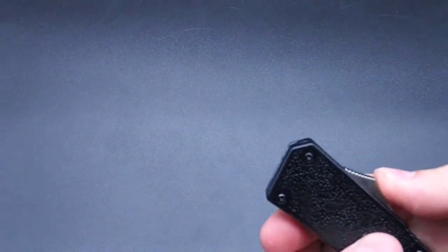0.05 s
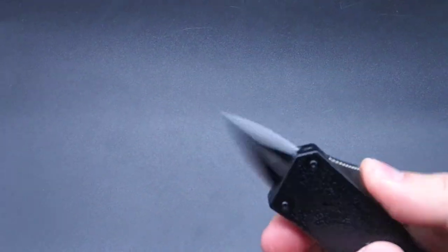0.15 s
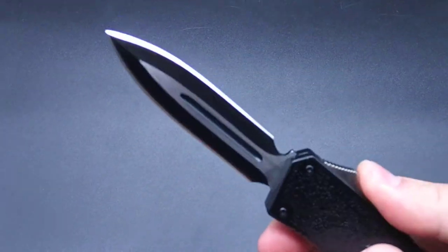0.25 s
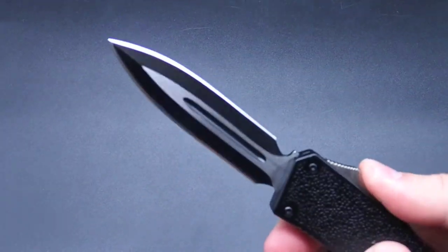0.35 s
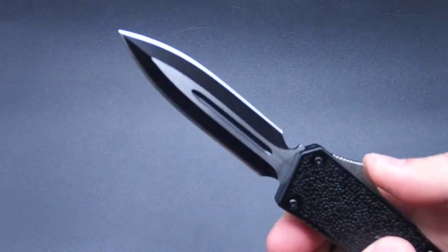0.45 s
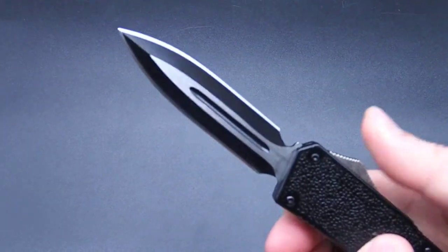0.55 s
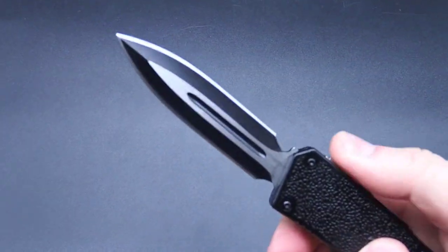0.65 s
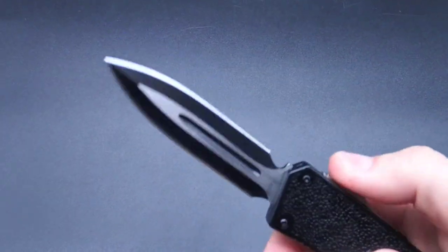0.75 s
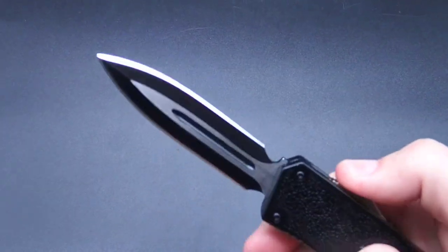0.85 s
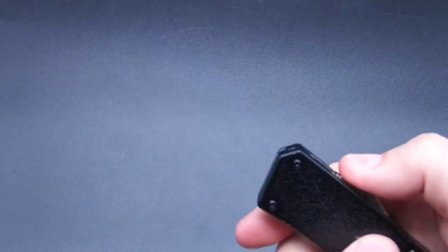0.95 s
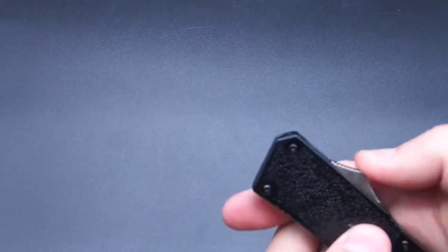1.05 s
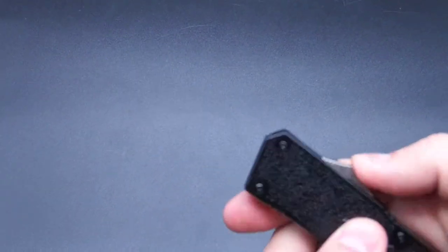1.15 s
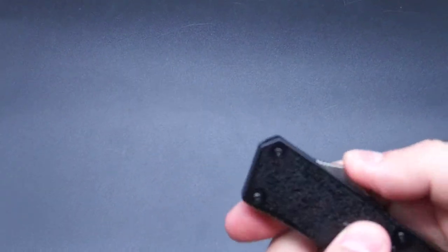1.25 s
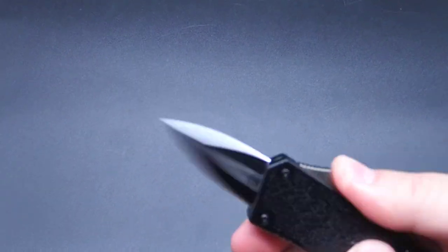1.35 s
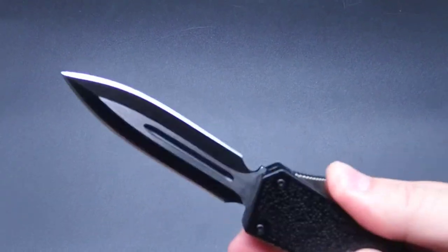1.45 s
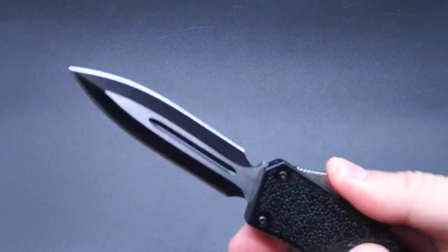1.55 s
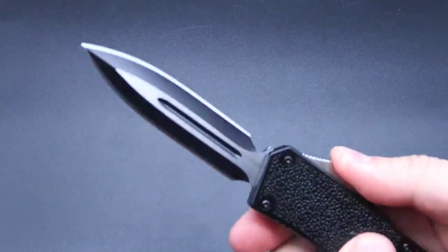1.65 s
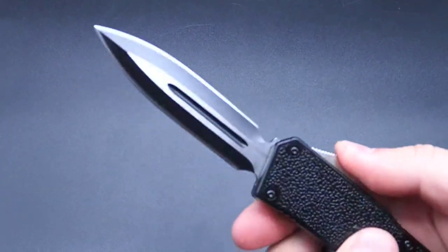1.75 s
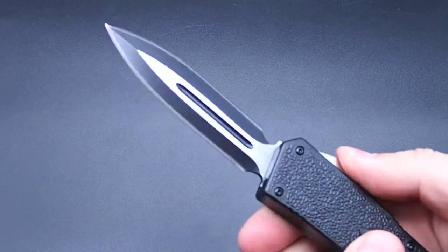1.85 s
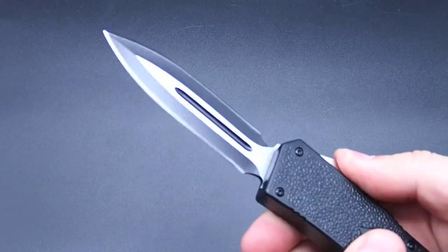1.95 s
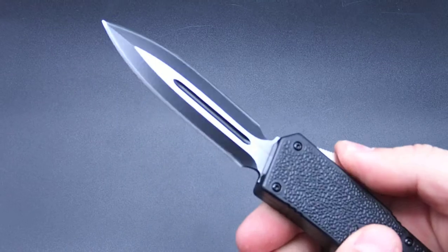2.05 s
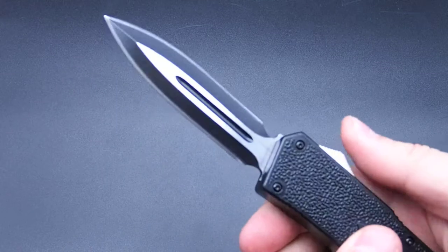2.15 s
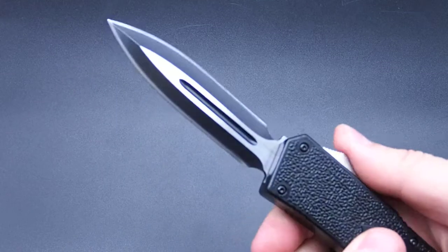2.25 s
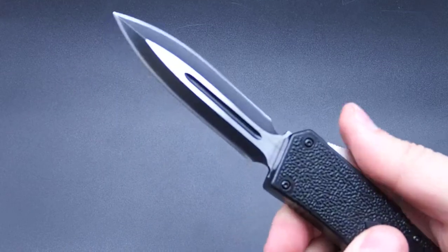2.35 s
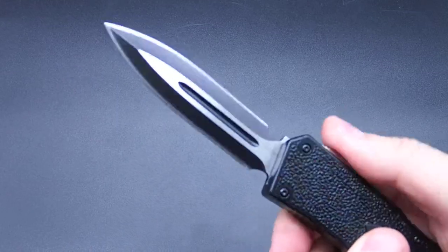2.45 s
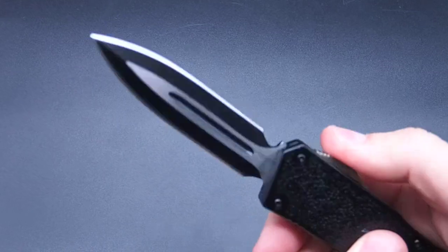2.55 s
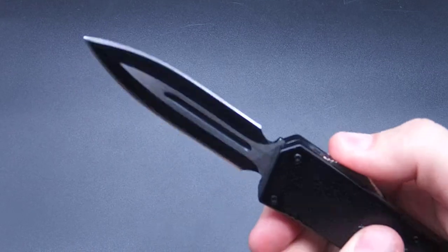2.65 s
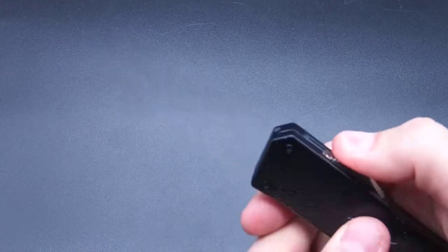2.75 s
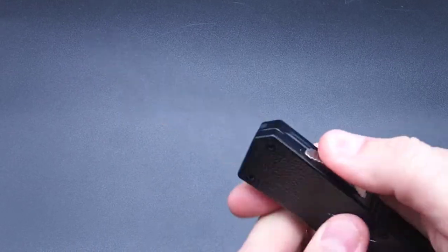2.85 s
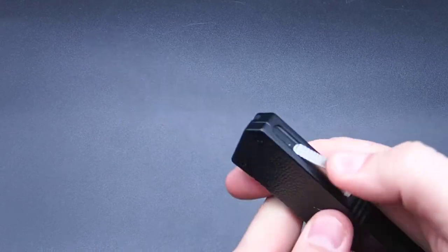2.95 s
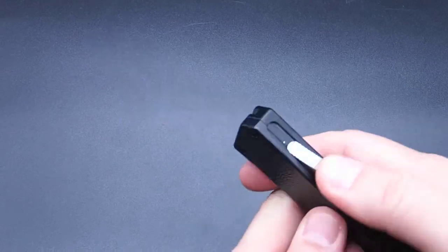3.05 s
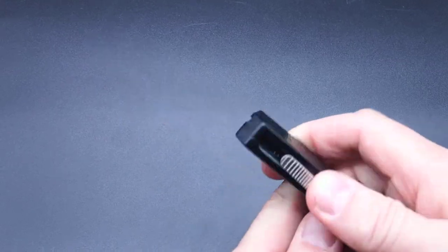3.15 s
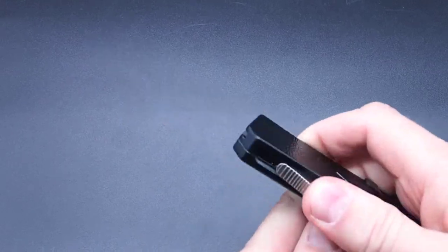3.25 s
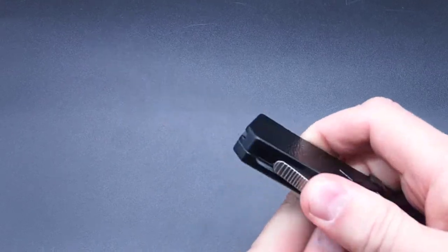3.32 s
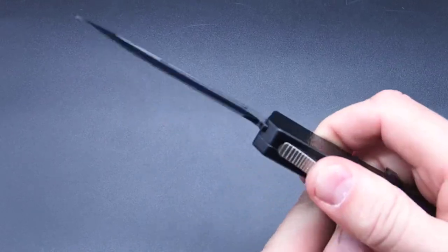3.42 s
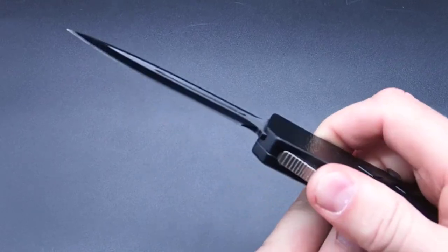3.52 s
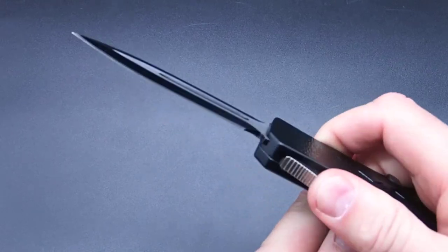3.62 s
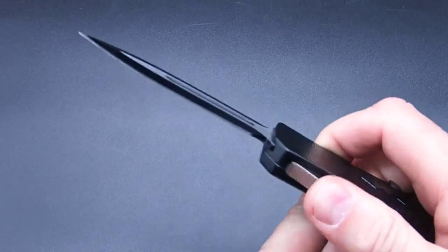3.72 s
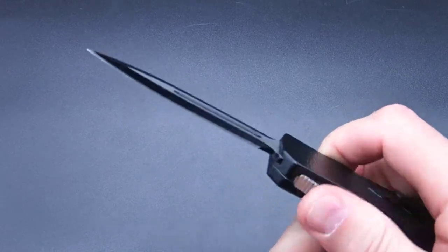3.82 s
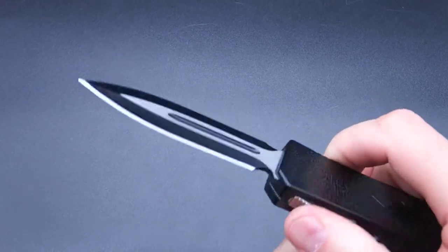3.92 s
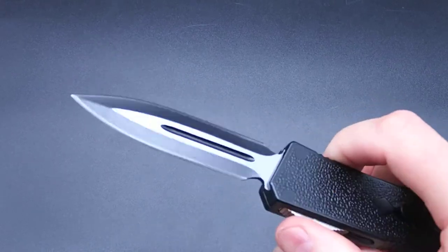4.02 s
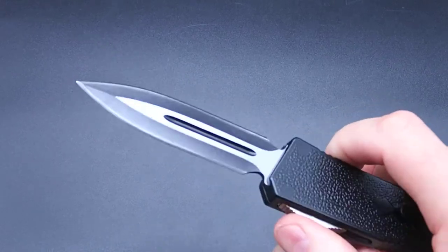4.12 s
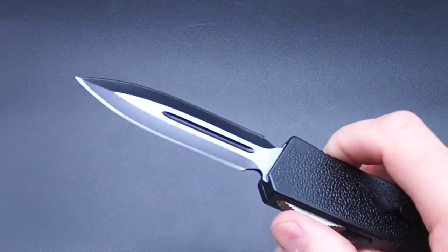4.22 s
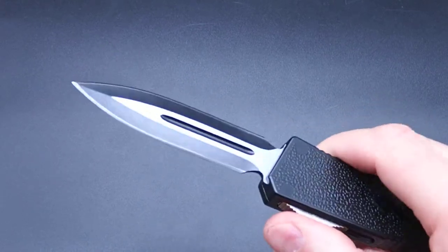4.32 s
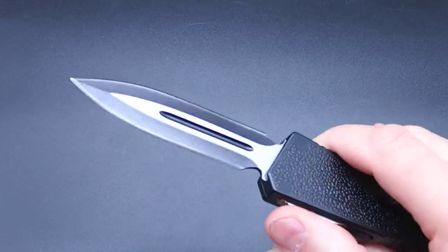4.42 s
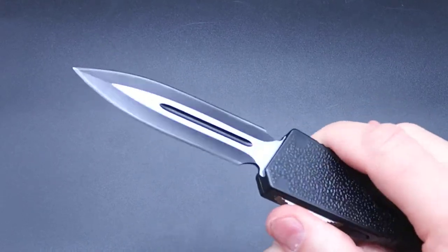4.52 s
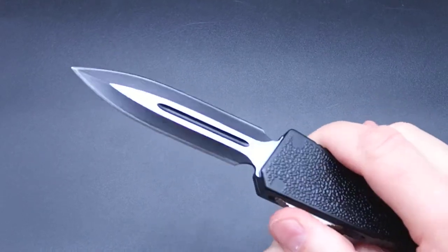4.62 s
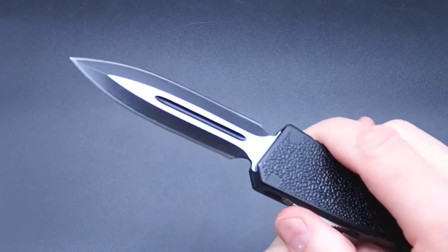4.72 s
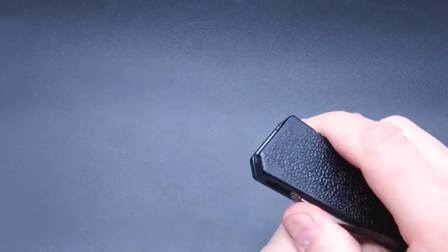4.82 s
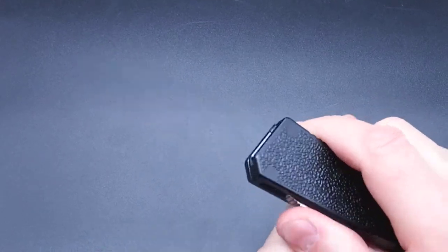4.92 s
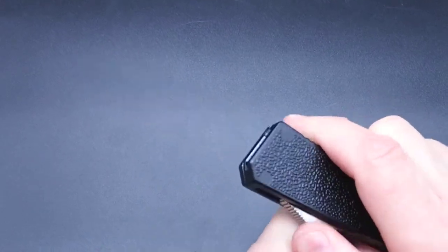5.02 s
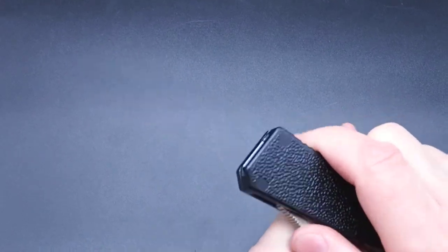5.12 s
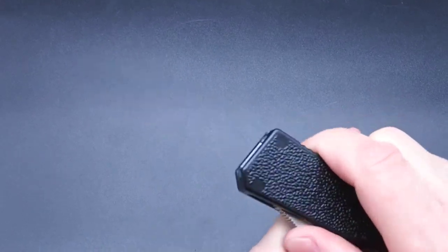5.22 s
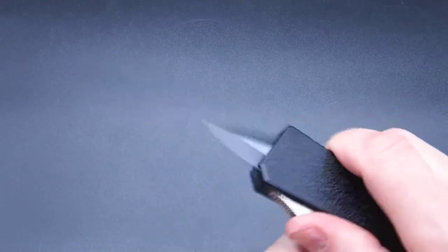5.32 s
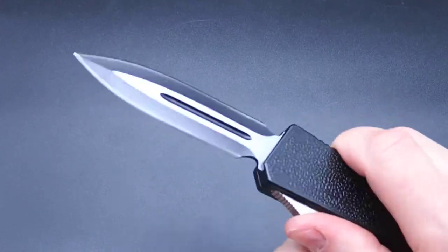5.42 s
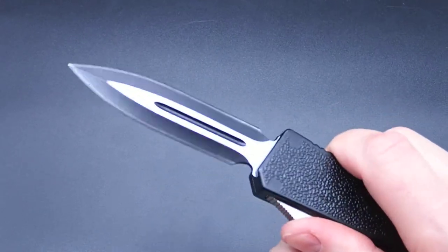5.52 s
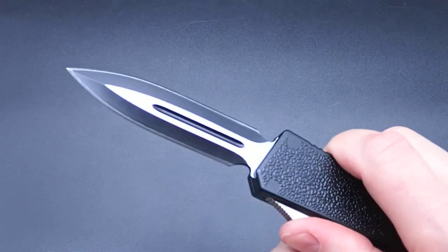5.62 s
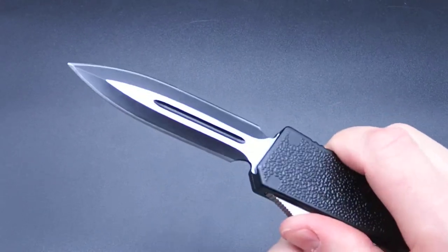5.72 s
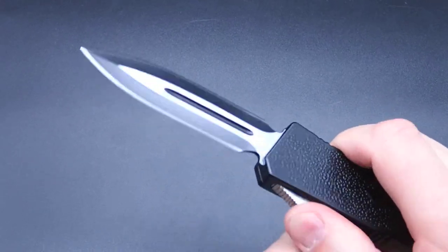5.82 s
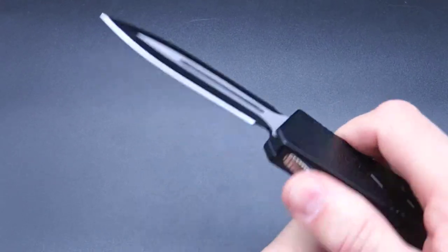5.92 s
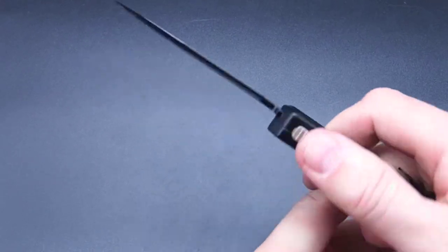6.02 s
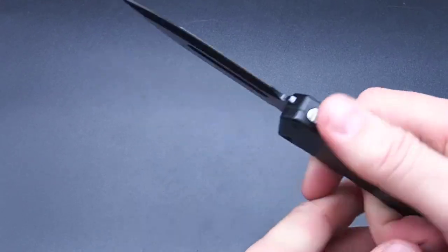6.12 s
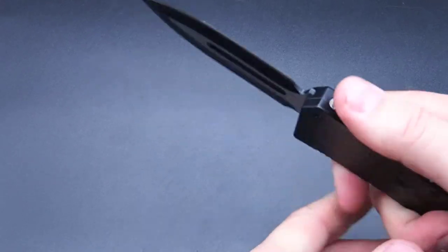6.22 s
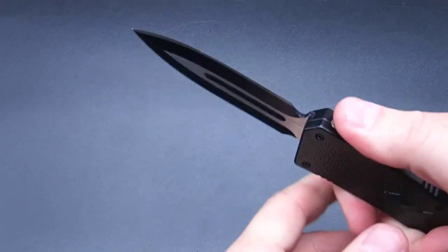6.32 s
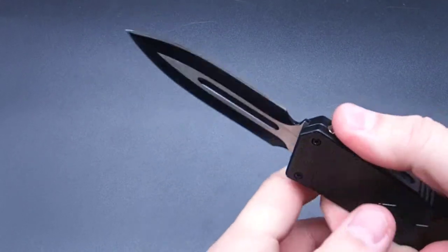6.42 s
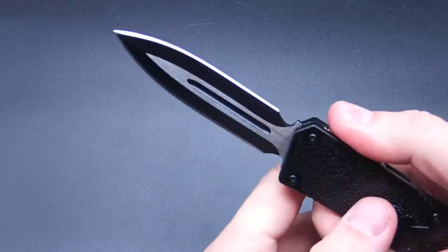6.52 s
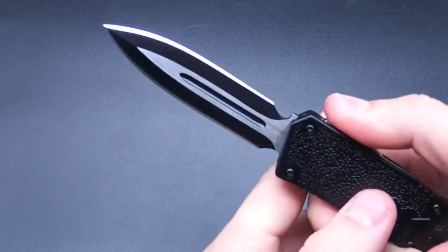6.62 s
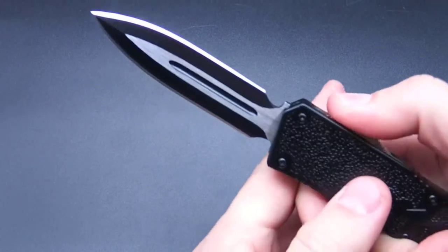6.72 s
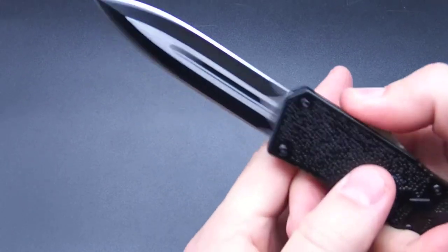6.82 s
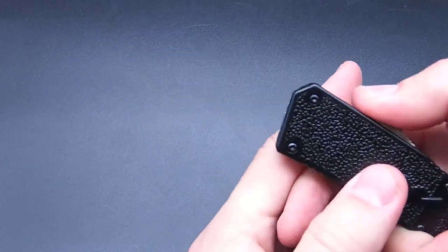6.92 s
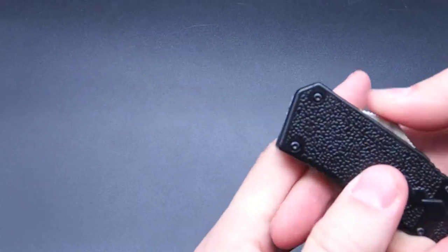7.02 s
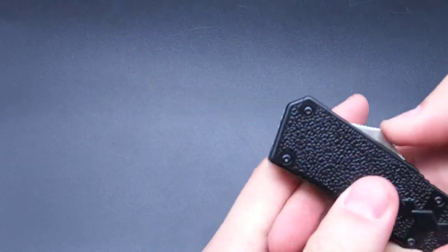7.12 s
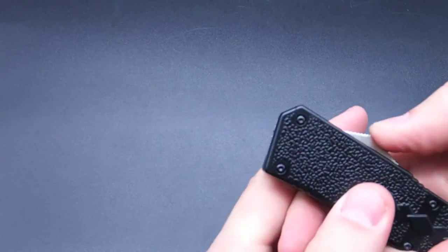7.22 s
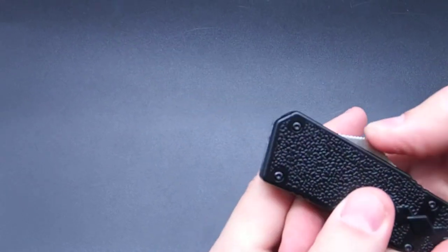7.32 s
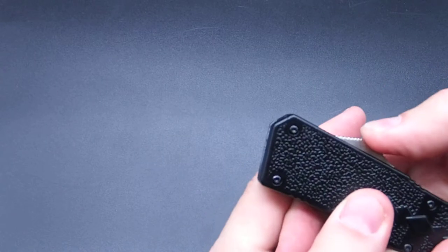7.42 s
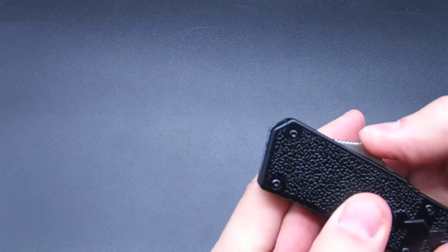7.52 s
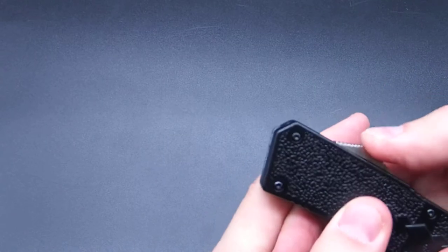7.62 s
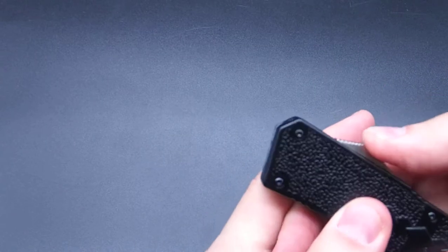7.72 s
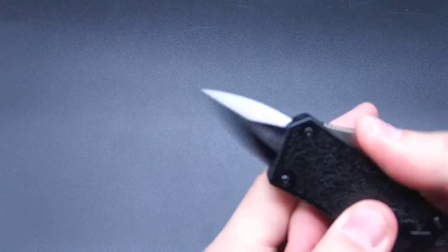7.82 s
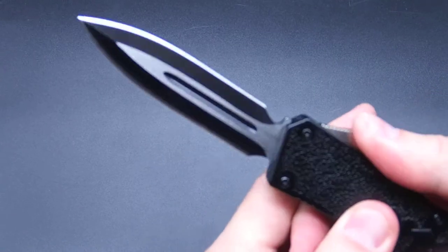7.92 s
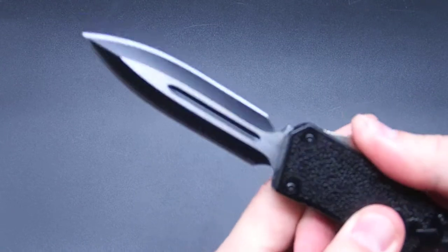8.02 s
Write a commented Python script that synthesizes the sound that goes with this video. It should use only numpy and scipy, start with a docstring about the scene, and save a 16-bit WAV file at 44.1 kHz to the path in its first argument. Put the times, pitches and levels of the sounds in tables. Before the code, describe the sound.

A spring-driven metal blade snaps out and back nine times with sharp rattling double clicks, over quiet hiss and faint slider scrapes, close up.

```python
"""Hiss comes first, then the small ticks of a thumb on the slider of a spring-driven blade in a metal handle.
Quiet room, small stereo microphone close by. The slider scrapes and squeaks as random slips until the latch
lets go in a burst of noisy chatter; 32-49 ms later the blade slams into its stop, a click that rings the handle.
Nine shots alternate out and in. The recorder turns its gain down on every snap, so the hiss sinks and
swells back; the hardest blows clip."""
import sys
import numpy as np
from scipy import signal
from scipy.fft import rfft, irfft, next_fast_len
from scipy.io import wavfile
from scipy.ndimage import uniform_filter1d

SR = 44100
rng = np.random.default_rng(int(sys.argv[2]) if len(sys.argv) > 2 else 0)


def generate_wav(sig):
    """Save sig (samples, or channels by samples) to the path in sys.argv[1] as 16-bit PCM at SR."""
    pcm = np.round(np.clip(np.atleast_2d(sig).T, -1, 1) * 32767).astype(np.int16)
    wavfile.write(sys.argv[1], SR, pcm)


N = 355446


def amp(db):
    """Decibels to gain."""
    return 10 ** (np.asarray(db) / 20)


def at_hz(points, hz, column=1):
    """A table read on a log-frequency axis."""
    p = np.array(points)
    return np.interp(np.log(np.maximum(hz, 1)), np.log(p[:, 0]), p[:, column])


def causal(points, size=2048):
    """Minimum-phase response of a spectrum: nothing sounds before the blow; peak 1."""
    hz = np.arange(size // 2 + 1) * SR / size
    cepstrum = irfft(np.log(amp(at_hz(points, hz))))
    # fold the cepstrum onto positive time
    cepstrum[1:size // 2] *= 2
    cepstrum[size // 2 + 1:] = 0
    h = irfft(np.exp(rfft(cepstrum)))
    return h / np.abs(h).max()


def band(x, kind, hz):
    """A slice of the spectrum cut by a Butterworth filter of design order 4."""
    return signal.sosfilt(signal.butter(4, hz, kind, fs=SR, output="sos"), x)


def sides(db):
    """Left and right gains for a left-right difference."""
    return amp(np.multiply.outer([.5, -.5], db))


def contacts(s, db):
    """A train of one-sample clicks."""
    # the tiny offset keeps the filters off denormal numbers
    return np.bincount(np.round(np.asarray(s) * SR).astype(int), amp(db), N) + 1e-12


# Colour of room air and microphone noise: [f/Hz, relative level/dB per Hz]
HISS_COLOUR = [(15, -54), (25, -17.5), (87, -5.5), (260, -1.5), (1560, -7.5), (1880, -17.5), (2150, -12.5),
               (2600, -21.5), (3140, -16), (3900, -26), (4900, -10.5), (7000, -9), (8100, -6.5),
               (9200, -13), (15900, -16)]
# How alike the two ports hear it: [f/Hz, left-right likeness -1 to 1]
HISS_LIKENESS = [(60, 0.36), (240, 0.052), (950, 0.14), (3770, -0.16), (15000, -0.12)]
# How it leans between the ports: [f/Hz, left-right level/dB]
HISS_BALANCE = [(60, 0.5), (380, 5), (2380, 3), (15000, 1.5)]
HISS_DB = -54   # ahead of the recorder's gain control


def hiss():
    """Room air and microphone noise: shaped noise, most alike in both ports in the deep bass."""
    size = next_fast_len(N)
    hz = np.arange(size // 2 + 1) * SR / size
    mid, side = rfft(rng.standard_normal((2, size)))
    alike = at_hz(HISS_LIKENESS, hz)
    both = np.sqrt(1 + alike) * mid + np.sqrt(1 - alike) * side * [[1], [-1]]
    shape = amp(at_hz(HISS_COLOUR, hz)) * sides(at_hz(HISS_BALANCE, hz))
    out = irfft(both * shape, size)[:, :N]
    return amp(HISS_DB) * out / out.mean(0).std()


# Room answer by band: [f/Hz, near reflections' t60/s, near level/dB, late tail level/dB]
ROOM_BANDS = [(700, .08, -17, -48.5), (1990, 0.08, -8.5, -32), (4000, 0.11, -8, -25),
              (6050, 0.084, -4.5, -24), (9000, 0.11, -11.5, -28), (14000, 0.076, -16.5, -32)]
LATE_T60_S = 0.29


def room(x):
    """Dense near reflections and a fainter, longer tail, other ones at each port, dying band by band."""
    size = SR // 2
    t, hz = np.arange(size) / SR, np.arange(size // 2 + 1) * SR / size
    noise = rfft(rng.standard_normal((2, size)))
    centres = np.array(ROOM_BANDS)[:, 0]

    def dying(db, t60):
        return amp(db - 60 * t / t60) / np.sqrt(t60 * SR / np.log(1e6))

    tail = 0
    for k, (_, t60, near_db, late_db) in enumerate(ROOM_BANDS):
        only_this_band = np.arange(len(centres)) == k
        share = at_hz(np.c_[centres, only_this_band], hz)   # cross-fades into the neighbours
        tail = tail + (dying(near_db, t60) + dying(late_db, LATE_T60_S)) * irfft(noise * share)
    tail *= np.clip((t - .002) / .004, 0, 1)   # the nearest surface answers after a few ms
    return signal.oaconvolve(x, tail, axes=1)[:, :N]


# Each shot of the blade: [way, latch lets go t/s, blade slams t/s, release rattle level/dB, its t60/s,
# lock rattle level/dB, slam level/dB, rebound rattle level/dB]
SHOTS = [("out", 0.171, 0.2181, -9.5, .068, -14, 9.5, -4),
         ("in", 0.8957, 0.9292, -11.5, .28, -11, 9.5, -2.5),
         ("out", 1.3665, 1.4153, -11, .088, -7.5, 13, -5.5), ("in", 2.7353, 2.7682, -9.5, .12, -14, 11, -3),
         ("out", 3.39, 3.4387, -11, .1, -7.5, 11, -3), ("in", 4.7905, 4.8235, -9.5, .22, -10.5, 18.5, -1.5),
         ("out", 5.345, 5.3908, -12, .15, -9, 14, -1.5), ("in", 6.8508, 6.8825, -10.5, .25, -10.5, 10, -3),
         ("out", 7.8436, 7.8914, -9.5, .08, -6, 13, -4.5)]
# Slider dragged against the spring until each latch lets go: [start t/s, hardest push t/s,
# level/dB at start, at hardest, at end, squeak f/Hz, squeak level/dB re scrape when hardest]
DRAGS = [(0.085, 0.105, -60, -51, -56, 5590, -5), (0.75, 0.826, -59, -47.5, -57, 5430, -6),
         (1.29, 1.356, -59, -47, -47, 5700, -1.5), (2.572, 2.68, -51, -51, -63, 5450, -14),
         (3.31, 3.38, -61.5, -48, -56, 5700, 9), (4.61, 4.695, -58, -53, -52, 5570, 6),
         (5.247, 5.298, -53, -45, -62, 5660, 6), (6.668, 6.735, -52, -48, -61, 5520, 5),
         (7.74, 7.83, -52, -52, -54, 5580, -2.1)]
# Colour of sliding metal: [f/Hz, relative level/dB per Hz]
SCRAPE = [(2500, -19), (4200, -22.5), (4800, -2), (5500, 1), (6300, -4), (7300, -3.5), (8300, -10.5),
          (9500, -20), (15000, -19)]
# Latch grating at the moment it lets go, by way: level/dB
CREEP_DB = {"out": -39, "in": -49}
CREEP_RISE_S = .035   # time the grating takes to climb 60 dB
SQUEAK_FADE_DB_PER_S = 150   # either side of the hardest push


def drag(slips_per_s, spread_db, squeak_width_hz, lean_db, lump_db, lump_hz):
    """Uneven slips of the slider along its groove, with a rough squeak strongest at the hardest push."""
    t = np.arange(N) / SR
    level, pitch, squeak = np.zeros((3, N))
    for (start, hardest, *level_db, hz, squeak_db), (way, release_s, *_) in zip(DRAGS, SHOTS):
        on = (t >= start) & (t < release_s)
        push_db = np.interp(t, [start, hardest, release_s], level_db)
        # the latch grates louder in the last moments before it lets go
        creep_db = CREEP_DB[way] - 60 * abs(release_s - t) / CREEP_RISE_S
        level += on * (amp(push_db) + amp(creep_db))
        pitch += on * hz
        squeak += on * amp(squeak_db - SQUEAK_FADE_DB_PER_S * abs(t - hardest))
    happens = rng.random(N) < slips_per_s / SR
    slips = happens * amp(spread_db * rng.standard_normal(N)) * rng.choice([-1, 1], N)
    scrape = signal.oaconvolve(slips, causal(SCRAPE))[:N]
    lumps = band(rng.standard_normal(N), "low", lump_hz)
    lumpy_scrape = amp(lump_db * lumps / lumps.std()) * scrape / scrape.std()
    # slow part of the slips roughens the squeak
    waver = band(slips, "low", squeak_width_hz)
    tone = squeak * waver / waver.std() * np.sin(2 * np.pi * np.cumsum(pitch) / SR)
    return sides(lean_db)[:, None] * level * (lumpy_scrape + tone)


# How the two ports hear the knife's main band, lows, mids and highs:
# [filter kind, edges f/Hz, left-right level/dB, likeness 0-1, unused]
PORTS = [("band", [4260, 9110], 2.3, 0.88, 0), ("band", [436, 1910], 1.5, 0.98, 0), ("band", [1580, 4400],
         0.71, .97, 0), ("high", 9000, 5.7, 0.36, 0.72)]


def in_bands(rows, colour, click, grit_level):
    """Clicks and gritty noise coloured band by band; rows give the main level, then lows, mids, highs re it."""
    level_db, *others_db = np.transpose(rows)
    common, own = rng.standard_normal(N), rng.standard_normal((2, N))
    out = 0
    for extra_db, (kind, hz, lean_db, alike, _) in zip((0, *others_db), PORTS):
        h = band(causal(colour), kind, hz)
        noise = np.sqrt(alike) * common + np.sqrt(1 - alike) * own
        grit = noise * grit_level(level_db + extra_db) / np.sqrt(h @ h)
        sharp = click(level_db + extra_db) / np.abs(h).max()
        both = sides(lean_db)[:, None] * (grit + sharp)
        out = out + signal.oaconvolve(both, h[None], axes=1)[:, :N]
    return out


# Ringing modes of handle and blade: [f/Hz, relative level/dB, t60/s, left-right level/dB]
MODES = [(840, -60, 0.05, 0.1), (2050, -42.5, 0.09, -8), (3130, -34.5, 0.037, -11),
         (3900, -35.5, 0.026, 21), (4500, -23, 0.056, 4), (5300, -12, 0.032, 13), (5510, -42.5, 0.034, -21),
         (6400, -37, .03, -14), (6620, -35, .02, 2), (7560, -27.5, 0.0245, 4), (9900, -25, .03, -9),
         (14000, -50, .02, 8)]


def blows(rows, colour, sharp, chatter_db, chatter_t60, ring_db):
    """Each blow is a click trailed by a dying chatter, and it rings the handle's modes."""
    rows = np.array(rows)
    s, level_db = rows[:, 0], rows[:, 1]
    fade = amp(-60 / (chatter_t60 * SR))

    def click(db):
        return sharp * contacts(s, db)

    def chatter(db):
        return amp(chatter_db) * signal.lfilter([1], [1, -fade], contacts(s, db))

    out = in_bands(rows[:, 1:5], colour, click, chatter)
    luck = rng.uniform(-1, 1, (len(s), len(MODES)))
    for k, (hz, mode_db, t60, lean_db) in enumerate(MODES):
        # each blow lands elsewhere, so each mode's share varies
        clicks = contacts(s, level_db + ring_db + mode_db + 6.8 * luck[:, k])
        r, w = amp(-60 / (t60 * SR)), 2 * np.pi * hz / SR
        ring = signal.lfilter([0, np.sin(w)], [1, -2 * r * np.cos(w), r * r], clicks)
        out += sides(lean_db)[:, None] * ring
    return out


# Thumb and slider ticks: [t/s, level/dB, lows level/dB re that]
TICKS = [(0.0415, -41, -21), (0.0505, -36, -25), (0.5237, -39, -10.1), (0.7234, -44, -10.1),
         (0.7587, -43, -14), (0.8195, -36.5, -19.5), (1.056, -33, -10.1), (1.2431, -20.1, -38),
         (1.7913, -38, -17), (1.8094, -36, -13), (2.5735, -39, -17), (3.25, -39, -15), (3.277, -38, -18),
         (4.2832, -34.5, -20.1), (4.59, -31, -27), (4.5955, -33, -27), (4.6733, -44, -17),
         (4.7202, -37, -17), (5.252, -38, -25), (6.6702, -32.5, -20.1), (6.7037, -40, -23),
         (6.717, -38, -22), (6.7945, -37, -17), (7.3264, -48, -12), (7.4056, -28, -22), (7.4654, -41, -14),
         (7.5602, -36, -18), (7.631, -39, -18), (7.6365, -35, -18), (7.7433, -39.5, -21)]


def ticks(mids_db, highs_db):
    """Thumb and slider touch metal: faint clicks in the scrape's colour with a short grating trail."""
    rows = [(s, db, lows_db, mids_db, highs_db) for s, db, lows_db in TICKS]
    return blows(rows, SCRAPE, sharp=0.49, chatter_db=-10.5, chatter_t60=0.049, ring_db=-7)


# A hard contact as the microphone colours it: [f/Hz, relative level/dB per Hz]
CRACK = [(59, -61), (100, -32.5), (523, -32), (1570, -32.5), (1830, -33.5), (2680, -15.5), (3040, -15),
         (4090, -22), (5500, 1.5), (8060, -5), (9150, -14), (12100, -14.5), (14300, -9.5), (15900, -37)]
# Rattle after release, by way: [swell/dB, swell/s, then lows, mids, highs level/dB re main]
RELEASE = {"out": (6.5, .011, -30, -20.5, -8.5), "in": (12, .006, -31, -21, -7.5)}
# Rattle after the slam, by way: [swell/dB, swell/s, t60/s, then lows, mids, highs level/dB re main]
REBOUND = {"out": (0.1, .006, .07, -30, -21, -11.5), "in": (0.1, .005, .056, -36, -17, -11.5)}
# Lock riding up just before the slam, by way: [lead/s, swell/dB, swell/s, t60/s,
# then lows, mids, highs level/dB re main]
LOCK = {"out": (.0088, 6, .008, .033, -26, -19, -8), "in": (.0035, 11, .0035, .02, -27, -19, -11)}
STOP_T60_S = .03   # the travel rattle is choked once the blade has slammed home


def rattle(uneven_db, lump_s, rebound_s):
    """Loose parts clatter too densely to tell apart: lumpy noise swells at release, lock and rebound, then dies."""
    bursts = []   # start s, choked from s, level, swell dB, swell s, t60 s, lows, mids, highs
    for way, release_s, slam_s, release_db, t60, lock_db, _, rebound_db in SHOTS:
        swell_db, swell_s, *colour = RELEASE[way]
        lead_s, *lock = LOCK[way]
        bursts += [(release_s, slam_s, release_db, swell_db, swell_s, t60, *colour),
                   (slam_s + rebound_s, np.inf, rebound_db, *REBOUND[way]),
                   (slam_s - lead_s, np.inf, lock_db, *lock)]
    bursts = np.array(bursts)
    lumps = uniform_filter1d(rng.standard_normal(N), max(int(lump_s * SR), 1))
    lumps = amp(uneven_db * lumps / lumps.std())

    def envelope(db):
        out, t = np.zeros(N), np.arange(SR // 8) / SR
        for (s, stop_s, _, swell_db, swell_s, t60), gain in zip(bursts[:, :6], amp(db)):
            i = round(s * SR)
            rising_db = -swell_db * (1 - t / swell_s)
            dying_db = -60 * (t - swell_s) / t60
            choke_db = -60 * np.maximum(s + t - stop_s, 0) / STOP_T60_S
            shape_db = np.where(t < swell_s, rising_db, dying_db) + choke_db
            out[i:i + len(t)] += (gain * amp(shape_db))[:N - i]
        return out * lumps

    def no_click(db):
        return np.zeros(N)

    return in_bands(bursts[:, [2, 6, 7, 8]], CRACK, no_click, envelope)


# Single knocks of latch and spring carrier: [t/s, level/dB, mids, highs level/dB re that]
KNOCKS = [(0.1795, -2.5, -3, -.1), (0.2212, 2.1, -21, -15), (0.9008, -8, -25, -6), (0.9029, -1.5, -35, -11),
          (1.3678, -9, -29, -16), (1.3711, 0.1, -24, -19), (1.3737, -6, -25, -13), (1.3761, -1.1, -24, -5),
          (1.42, 6, -28, -17), (2.74, -5.5, -16.5, -14), (2.7467, -7, -32, -12), (2.771, 6, -19, -19),
          (3.3966, -3.5, -23, 4), (3.4002, -4, -32, -9), (4.7951, -2.1, -32, 1.1), (4.7978, -9, -30, -7),
          (4.8265, -3, -30, -13), (5.3488, -8, -27, -18), (5.3515, -3.5, -41, -3), (5.3559, -5, -28, -9),
          (5.3609, -5, -38, -14), (5.3847, 8, -30, -15), (6.8518, -5, -30, -13), (6.8561, -6, -28, -10.1),
          (6.8607, -4.5, -21, -4), (6.867, -6, -20.5, -15), (7.8519, 2.5, -27, -16), (7.8539, -6, -24, -16)]


def knocks(lows_db):
    """Latch and spring carrier hit the handle: hard clicks with a few ms of chatter."""
    rows = [(s, db, lows_db, mids_db, highs_db) for s, db, mids_db, highs_db in KNOCKS]
    return blows(rows, CRACK, sharp=0.83, chatter_db=-8.5, chatter_t60=0.00574, ring_db=-5.5)


# Blows that catch one mode of the handle squarely: [t/s, mode number from 0, level/dB]
PINGS = [(.2195, 11, -10.1), (1.056, 0, -47), (1.4165, 11, -9), (2.7405, 11, -17), (3.397, 6, -8),
         (3.407, 7, -19), (3.4395, 10, -13), (4.802, 10, -11), (5.352, 5, -1.5), (5.369, 7, -19),
         (5.393, 10, -6), (6.853, 1, -35), (6.867, 1, -24.5), (7.851, 6, -8)]
PING_T60_S = .055


def pings(lean_db, split):
    """One mode rings clearly: a pair of close decaying tones with a quick onset."""
    out, t = np.zeros(N), np.arange(SR // 5) / SR
    for s, mode, level_db in PINGS:
        i, hz = round(s * SR), MODES[round(mode)][0]
        # two close modes beat
        pair = np.sin(2 * np.pi * hz * t) + .6 * np.sin(2 * np.pi * hz * (1 + split) * t)
        onset = np.minimum(t / 0.0011, 1)
        out[i:i + len(t)] += (amp(level_db - 60 * t / PING_T60_S) * pair * onset)[:N - i]
    return sides(lean_db)[:, None] * out


# Where each slam lands colours it: [lows, mids, highs, thump level/dB re slam]
SLAM_COLOURS = [(-39, -10, -9, -42), (-22, -6.5, -3, -15), (-26.5, -14, -17, -37), (-33, -6, -5, -33),
                (-30.5, -25, -8, -13), (-22.5, -17, -10, -23), (-54, -26, -9.5, -19.5), (-49, -5, -16, -29),
                (-26, -22, -19, -23)]


def thump(hz):
    """The slam jolts the whole handle: one short dull push."""
    _, _, slam_s, *_, level_db, _ = zip(*SHOTS)
    return band(contacts(slam_s, np.add(level_db, np.array(SLAM_COLOURS)[:, 3])), "low", hz)


def slams():
    """The blade hits its stop: the sharpest clicks, a brief chatter, ringing modes and a thump."""
    rows = [(slam_s, db, *colour) for (_, _, slam_s, *_, db, _), colour in zip(SHOTS, SLAM_COLOURS)]
    cracks = blows(rows, CRACK, sharp=1.7, chatter_db=-9, chatter_t60=.005, ring_db=-12)
    return cracks + thump(hz=1500)


def scene():
    """The hiss, the room and the knife close to the microphone."""
    slider = drag(slips_per_s=2500, spread_db=4.0, squeak_width_hz=120, lean_db=1.5, lump_db=1.5, lump_hz=60)
    slider = slider + ticks(mids_db=-29, highs_db=-27)
    loose = rattle(uneven_db=2.5, lump_s=.0006, rebound_s=.0015)
    struck = knocks(lows_db=-40) + pings(lean_db=2.0, split=0.0034) + slams()
    knife = slider + loose + struck
    return hiss() + room(knife) + knife


def gain_control(x, above_db, slope, attack_s, release_s, size=32):
    """Gain falls fast while the level is over the threshold and creeps back in dB."""
    padded = np.pad(x ** 2, ((0, 0), (0, -N % size)))
    power = padded.mean(0).reshape(-1, size).mean(1)   # both ports, block by block
    wanted = -slope * np.maximum(10 * np.log10(power + 1e-12) - above_db, 0)
    down = 1 - np.exp(-size / SR / attack_s)
    up = 1 - np.exp(-size / SR / release_s)
    cut_db = [0.]
    for want in wanted:
        speed = down if want < cut_db[-1] else up
        cut_db.append(cut_db[-1] + (want - cut_db[-1]) * speed)
    return x * amp(np.interp(np.arange(N) / size, np.arange(len(cut_db)), cut_db))


CUTOFF_HZ = 16350


def record(dry):
    """Gain control, clipping at full scale, a steep top cut, then clipping again."""
    held = gain_control(dry, above_db=-31, slope=0.85, attack_s=0.02, release_s=0.091)
    top_cut = signal.cheby2(18, 45, CUTOFF_HZ, fs=SR, output="sos")
    return np.clip(signal.sosfilt(top_cut, np.clip(held, -1, 1)), -1, 1)


dry = scene()
out = record(dry)
generate_wav(out)
```